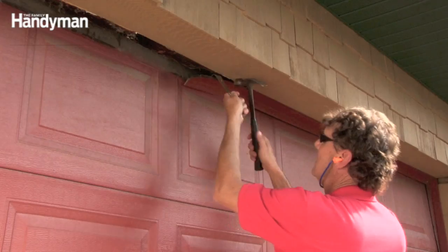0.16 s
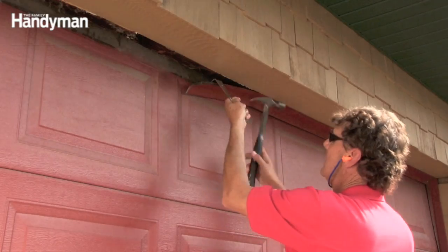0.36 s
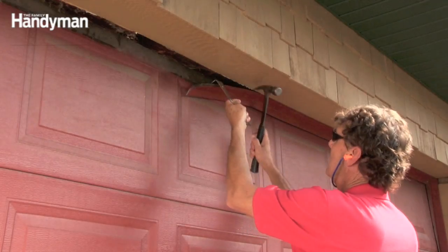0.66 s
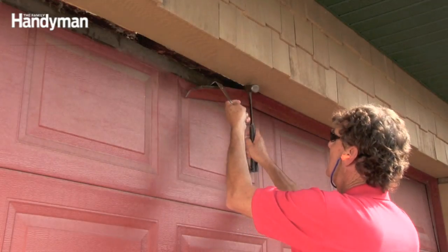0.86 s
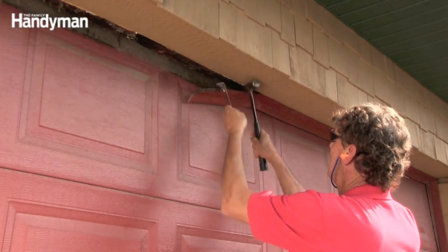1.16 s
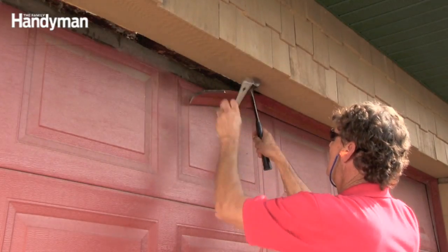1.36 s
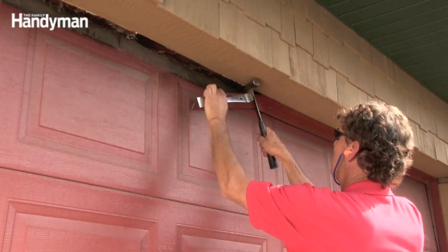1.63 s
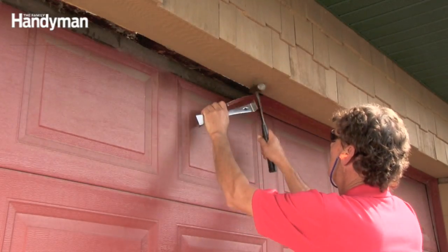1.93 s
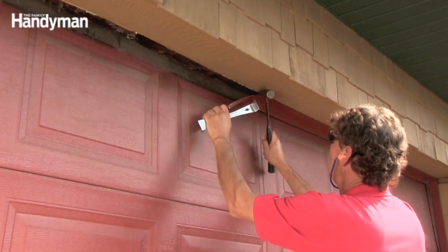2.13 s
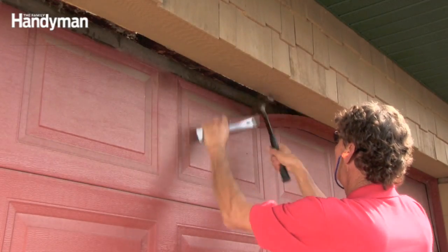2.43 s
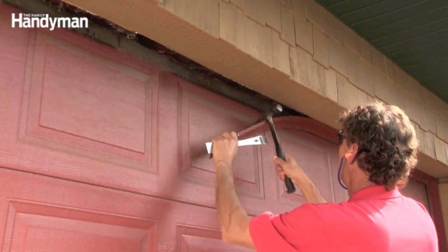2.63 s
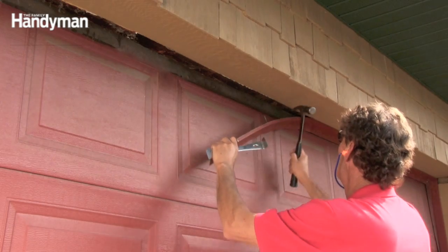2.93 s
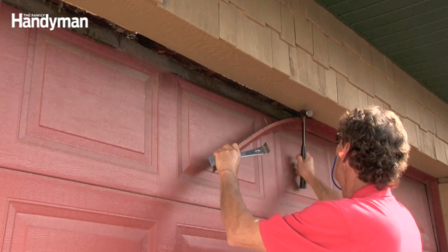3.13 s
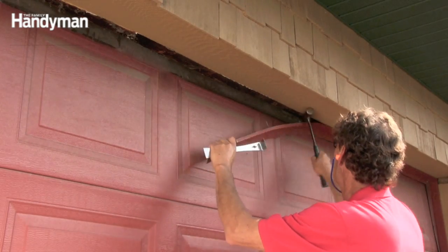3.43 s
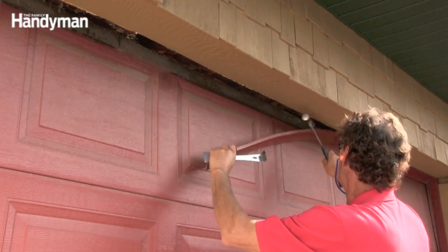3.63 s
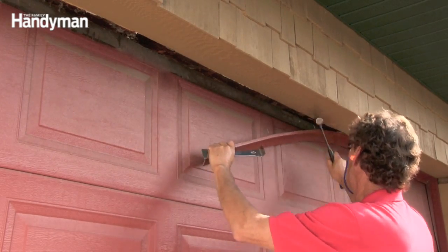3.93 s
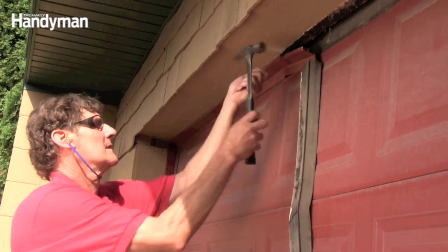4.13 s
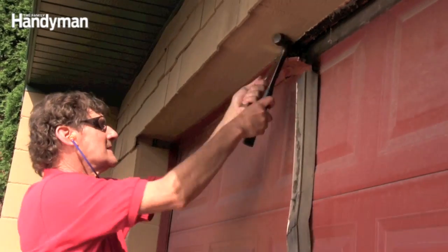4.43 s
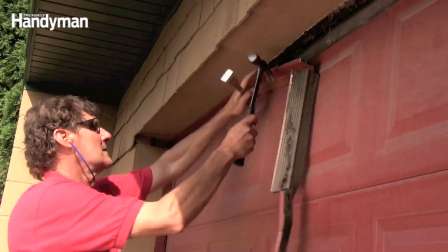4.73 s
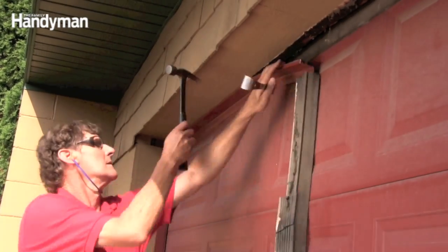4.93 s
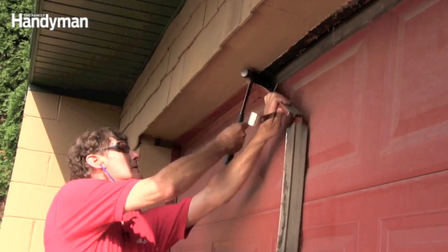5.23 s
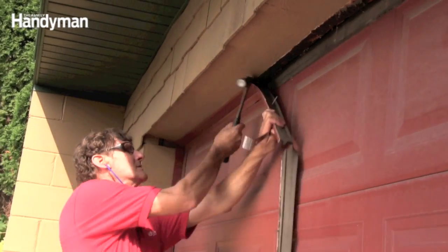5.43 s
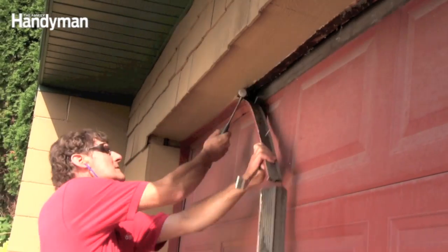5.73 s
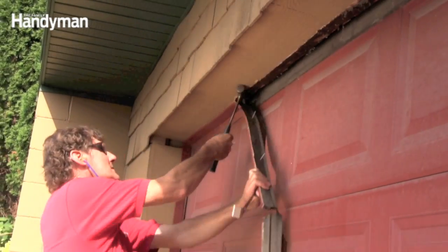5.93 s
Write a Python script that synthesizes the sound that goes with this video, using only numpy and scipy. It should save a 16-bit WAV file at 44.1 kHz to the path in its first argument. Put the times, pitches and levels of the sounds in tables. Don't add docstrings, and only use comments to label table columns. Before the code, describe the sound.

Outdoors, steel tools knock and pry at nailed wooden trim on a hollow garage door; sharp cracks, splintering creaks, clinks and one brief nail screech.

```python
import sys
import numpy as np
from scipy import signal
from scipy.fft import rfft, irfft, next_fast_len
from scipy.io import wavfile
from scipy.ndimage import uniform_filter1d, minimum_filter1d, map_coordinates

SR = 44100
rng = np.random.default_rng(int(sys.argv[2]) if len(sys.argv) > 2 else 0)


def linear_from_db(decibels):
    return 10 ** (np.asarray(decibels, float) / 20)


def transcribe(u):
    v = np.clip(np.atleast_2d(u).T, -1, 1)
    q = np.round(v * 32767).astype(np.int16)
    wavfile.write(sys.argv[1], SR, q)


N = 267466


def unit(x):
    return x / np.sqrt(np.mean(x ** 2, -1, keepdims=True) + 1e-20)


def peak_one(x):
    return x / np.abs(x).max(-1, keepdims=True)


def along(points, hz):
    f, v = np.transpose(points)
    return np.interp(np.log(hz + 1), np.log(f + 1), v)


def curves(rows):
    s, *cols = np.transpose(rows)
    return [np.interp(np.arange(N) / SR, s, c) for c in cols]


def wobble(rate_hz, size=N):
    knots = rng.standard_normal(int(size * rate_hz / SR) + 4)
    return map_coordinates(knots, [np.arange(size) * rate_hz / SR])


def add_at(out, s, sound):
    start = round(s * SR)
    out[start:start + len(sound)] += sound


def filtered(x, response):
    n = x.shape[-1]
    m = next_fast_len(n + 4096)
    return irfft(rfft(x, m) * response(np.fft.rfftfreq(m, 1 / SR)), m)[..., :n]


def body(modes, shift=1, vary_db=None):
    def response(f):
        total = 0
        for k, (hz, width_hz, db) in enumerate(modes):
            level_db = db if vary_db is None else db + vary_db[:, [k]]
            damping = 1j * f * width_hz
            total = total + (-1) ** k * linear_from_db(level_db) * damping / ((hz * shift) ** 2 - f * f + damping)
        return total
    return response


def coloured(x, spectrum):
    return unit(filtered(x, lambda hz: linear_from_db(along(spectrum, hz))))


def noise(spectrum):
    return coloured(rng.standard_normal(N), spectrum)


def grit(per_s, spread_db):
    size = np.minimum(rng.exponential(size=N), 4)
    return (rng.random(N) < per_s / SR) * rng.standard_normal(N) * linear_from_db(spread_db * size)


def held(rows):
    out, t = np.zeros(N + SR), np.arange(SR // 4) / SR
    for s, length_s, hz, db in rows:
        shape = np.clip(np.minimum(t, length_s - t) / (0.12 * length_s), 0, 1) ** 2
        level = linear_from_db(db + 1.5 * wobble(90, len(t)))
        add_at(out, s, shape * level * np.sin(2 * np.pi * hz * t + 0.2 * wobble(100, len(t))))
    return out[:N]


# (time [s], level [dB])
LOW_RUMBLE = [(0.0, -40), (0.32, -50), (1.1, -46), (1.88, -49.5), (2.2, -45), (3.1, -47), (3.5, -38.5),
              (4.0, -51), (4.6, -48.5)]
# (frequency [Hz], density [dB per Hz])
RUMBLE = [(15, -41), (25, -30), (47, -6), (65, 3), (108, -3), (170, -8), (220, -50), (370, -120)]
# (frequency [Hz], density [dB per Hz])
AIR = [(71, -35.5), (120, -2), (173, -8.5), (289, -15.5), (341, -19), (513, -13), (698, -18.5),
       (892, -19.5), (1370, -24.5), (3900, -41.5), (8310, -44), (16000, -52)]
# (time [s], level [dB])
CHORUS = [(0, -97), (.6, -91), (1.3, -85), (2.6, -81), (3.2, -77), (4.2, -79.5), (4.7, -84.5), (6.06, -85)]
# (frequency [Hz], width [Hz], level [dB])
INSECTS = [(7750, 300, -3), (8550, 160, -2), (7360, 160, -2), (6050, 200, -4), (9450, 300, -4)]
# (time [s], length [s], frequency [Hz], level [dB])
CHIRPS = [(2.74, .1, 5950, -68), (2.83, .15, 5950, -69), (1.91, .07, 6100, -76), (2.08, .07, 6150, -77),
          (3.36, .04, 6000, -75)]


def outdoors():
    chorus_db, = curves(CHORUS)
    rumble = linear_from_db(curves(LOW_RUMBLE)[0] + 2.8 * wobble(6.49)) * noise(RUMBLE)
    air = linear_from_db(-54 + 0.8 * wobble(3)) * noise(AIR)
    chorus = np.zeros(N)
    for band in INSECTS:
        pulsing = linear_from_db(chorus_db + 2.5 * wobble(25) + 2 * wobble(1.5))
        resonance = body([band])
        voice = unit(filtered(rng.standard_normal(N), lambda f: resonance(f) ** 2))
        chorus += linear_from_db(band[2]) * pulsing * voice
    return rumble + air + chorus + held(CHIRPS)


# (time [s], level [dB])
STRAIN = [(0.0, -61), (0.25, -56), (0.46, -99), (0.99, -59.5), (1.48, -68.5), (2.38, -63), (2.5, -34),
          (2.67, -56.5), (2.9, -66.5), (3.39, -58), (3.5, -43), (3.61, -39), (3.78, -49.5), (4.02, -49.5),
          (4.52, -51), (5.05, -48.5), (5.52, -51), (6.06, -57.5)]
# (time [s], length [s], rub [dB], hiss [dB], groan [dB])
STROKES = [(0.0, 0.12, -112, -86, -50), (2.128, 0.06, -48.5, -70, -60), (3.138, 0.06, -47.5, -62, -60),
           (0.828, 0.072, -46, -78, -67), (0.917, 0.038, -53.5, -56.5, -60), (1.632, 0.021, -75, -75, -73),
           (1.81, 0.056, -86, -78, -59), (2.213, 0.073, -49, -61, -54), (2.401, 0.1, -30, -30, -26),
           (2.732, 0.071, -90, -71, -49.5), (3.251, 0.058, -60, -53, -54), (3.447, 0.16, -36.5, -32, -30),
           (3.845, 0.059, -60, -46.5, -44), (3.914, 0.03, -55, -62, -45), (3.963, 0.077, -54, -52, -56.5),
           (4.335, 0.023, -30, -52, -53), (4.549, 0.12, -33.5, -40, -36.5), (4.663, 0.086, -49.5, -66, -50),
           (5.024, 0.12, -41, -55.5, -45), (5.114, 0.074, -50, -70, -51), (5.78, 0.026, -59, -67, -77)]
# (frequency [Hz], width [Hz], level [dB])
FRAME = [(847, 172, -4), (1200, 300, -0.5), (1480, 340, 0.5), (1910, 1210, -1), (2500, 1760, -3),
         (3720, 2100, -14)]
# (frequency [Hz], width [Hz], level [dB])
TRIM = [(225.3, 62, 1), (372, 69, 0.5), (495, 68, -1), (599, 276, -7.5)]
# (frequency [Hz], level [dB])
CRACK = [(1500, -32.5), (3500, 13), (5000, 11.5), (8000, 2.5), (12000, -1), (16000, -36.5)]


def scrape():
    t = np.arange(N) / SR
    level_db, = curves(STRAIN)
    over_db = level_db + 50
    rub_gain = linear_from_db(level_db - 7.5)
    crackle_gain = linear_from_db(-65 + over_db)
    groan_gain = linear_from_db(-49.5 + 1.13 * over_db)
    for s, length_s, rub_db, hiss_db, groan_db in STROKES:
        stroke = np.clip(np.minimum((t - s) / .15, s + length_s - t) / (.6 * length_s), 0, 1)
        rub_gain = rub_gain + linear_from_db(rub_db) * stroke
        crackle_gain = crackle_gain + linear_from_db(hiss_db) * stroke
        groan_gain = groan_gain + linear_from_db(groan_db) * stroke
    rub = unit(filtered(grit(3000, 2.3) * linear_from_db(1.1 * wobble(42)), body(FRAME)))
    crackle = coloured(grit(7000, 2.6) * linear_from_db(1.2 * wobble(90)), CRACK)
    groan = unit(filtered(grit(3000, .6) * linear_from_db(0.8 * wobble(22)), body(TRIM)))
    return rub_gain * rub + crackle_gain * crackle + groan_gain * groan


# (time [s], frequency [Hz], level [dB], t60 [s])
RINGS = [(0, 2450, -59, .16), (0, 3750, -56, .2), (.04, 5000, -68, .5), (.23, 3500, -59, .12),
         (.16, 13400, -71, .08), (1.272, 12220, -60, .13), (4.05, 1380, -58, .2), (4.64, 1000, -44, .2),
         (5.65, 11800, -68, .15),
         (3.4565, 4700, -15.5, 0.01), (3.4765, 4800, -16, .012), (3.4935, 4800, -14, .012),
         (3.5095, 6200, -17, 0.011), (3.526, 5500, -19, 0.013), (3.543, 5800, -20, .01),
         (3.451, 500, -16, 0.14), (3.471, 499, -14.5, 0.093), (3.488, 480, -15, 0.082),
         (3.843, 405, -16.5, 0.051), (.832, 220, -23, 0.06), (.848, 175, -24, 0.085),
         (4.64, 350, -30.5, 0.27), (4.64, 1330, -36, .1), (5.652, 340, -25, .18), (5.2, 250, -25, .1),
         (5.2, 213, -27, 0.11), (4.8, 220, -30, .15), (3.965, 920, -25.5, 0.065), (2.797, 2800, -38, 0.044),
         (2.5, 10500, -34, .015), (2.812, 9700, -43, .015), (2.766, 4400, -52, .03),
         (5.782, 1900, -43, .05), (.1395, 6400, -40, .012), (3.247, 450, -25, 0.075),
         (2.2705, 837, -20, 0.027), (5.9185, 7660, -23, 0.0063), (.311, 2900, -55, .02),
         (1.282, 3450, -55, .06), (4.66, 1050, -42, .2), (2.41, 560, -21.5, .2), (5.663, 2300, -40, .01),
         (.045, 230, -38, .2), (4.548, 2100, -12, .03), (5.545, 2000, -40, .01)]


def rings():
    t, out = np.arange(SR // 2) / SR, np.zeros(N + SR)
    for s, hz, db, t60_s in RINGS:
        level = linear_from_db(db - 60 * t / t60_s + 1.5 * wobble(49, len(t)))
        add_at(out, s, level * np.sin(2 * np.pi * hz * t + 0.6 * wobble(245, len(t))))
    return out[:N]


# (time [s], peak [dB], thud [dB], crack [dB])
KNOCKS = [(0.001, -42.5, -8, -13), (0.047, -29.5, -3, -43), (0.228, -30, -7, -42),
          (0.923, -33.5, -0.5, -13.5), (0.936, -25, -9.5, -40), (1.078, -38.5, 3, -34),
          (1.244, -30.5, -10.5, -38), (1.694, -38.5, -8, -13), (1.709, -40.5, -22, -13),
          (1.798, -40.5, 3.5, -11.5), (2.128, -16, -14, -29.5), (2.27, -19, -12, -27),
          (2.397, -3.5, -13.5, -31), (2.508, -17.5, -10, -35), (2.565, -21.5, -3.5, -30),
          (2.679, -46, 3, -31), (3.258, -40.5, 9, -25), (4.239, -44, 3.5, -21), (4.556, -11, -10, -23),
          (4.424, -38.5, -29, -8), (5.19, -32.5, -3.5, -40), (5.255, -28.5, 0.5, -40),
          (5.372, -42, -8, -18), (5.457, -29, -8, -20), (5.526, -17, -8, -18), (5.97, -37.5, -1, -18)]
# (time [s], peak [dB], thud [dB], crack [dB])
RAPS = [(0.832, -24, -6.5, -23), (1.282, -35, -11, -14.5), (2.262, -32.5, -11, -13),
        (3.137, -17.5, -7.5, -26), (3.246, -25, -5, -4), (3.449, -5, -11, -22), (3.604, -22, -20, -11),
        (3.682, -34.5, -5, -19), (3.703, -22, -13.5, -13), (3.84, -5.5, -21, -7), (3.846, -13.5, -3.5, -13),
        (3.304, -22, -9, -30), (1.547, -35.5, -10, -14.5), (4.302, -26, -8, -17), (4.34, -20, -15, -14.5),
        (4.547, 1, -41, -16), (4.561, -4.5, -14, -29), (4.619, -11.5, -15, -11), (4.634, -16.5, -5.5, -23),
        (4.843, -20.5, -6.5, -12.5), (5.545, -32, -9, -24.5), (5.631, -28, -32, -2), (5.653, -28, -19, -29),
        (5.782, -46, -33, -20), (2.462, -11, -5, -26), (3.536, -20, -28, -0.5)]
# (time [s], peak [dB], crack [dB], note [Hz], t60 [s])
CLINKS = [(0.139, -29, -39, 6350, 0.015), (0.226, -26, -31, 3950, 0.019), (2.796, -35.5, -5.5, 2800, 0.05),
          (3.738, -13.5, -14, 3780, 0.009), (3.955, -11, -12, 1930, 0.039), (3.963, -4, -5.5, 1480, 0.02),
          (4.589, -11, -4, 5440, 0.078), (4.608, -10.5, -26, 2200, 0.012),
          (5.151, -28.5, -39.5, 2550, 0.026), (5.832, -23, -35, 5570, 0.014),
          (5.836, -20, -14.5, 2130, 0.021), (5.918, -24, -9.5, 7500, 0.0091), (6.0, -30, -14, 2520, 0.11),
          (4.611, -10.5, -29, 2400, 0.012), (3.543, -20, -12, 5830, 0.02), (5.254, -17.5, -30, 2130, 0.01),
          (5.484, -21.5, -24, 2660, 0.01)]
# (time [s], peak [dB], crack [dB], note [Hz])
SLIPS = [(2.4122, -4.5, -17.5, 1100), (2.4237, -3.5, -14, 900), (2.4335, -10, -16, 1100),
         (2.4463, -4.5, -16, 1100), (3.4693, -5.5, -14, 1200), (3.4862, -6, -19, 1350),
         (3.5014, -9.5, -12, 1380), (3.5176, -16, -10, 1380), (2.4525, -7, -30.5, 700),
         (3.476, -16, -35, 4960), (3.4938, -17, -35, 4960), (3.526, -16.5, -35, 5500),
         (3.918, -50, 5, 1420), (3.9228, -52, 3, 1420), (3.9276, -52, 6, 1420), (3.9324, -55, 5, 1420)]
# (time [s], peak [dB], crack [dB])
TICKS = [(0.04, -41.5, -12), (0.303, -64, -7), (0.312, -50, -19), (0.325, -60.5, 6), (0.335, -60.5, 3),
         (0.363, -63, -2), (0.373, -71, -1), (1.092, -48.5, -1.5), (1.559, -48, -7), (2.765, -58, -3),
         (2.811, -34, -8), (2.821, -40, -4), (3.424, -42, 0), (4.181, -56, 1), (4.318, -50, 3),
         (4.378, -47, -2), (4.523, -47, -5), (4.441, -44.5, 5), (4.947, -43, -32), (5.013, -40, -23),
         (5.417, -44.5, 2), (5.802, -52, -9), (5.911, -51, 1)]


def hits():
    return ([(s, db, thud_db, crack_db, 668, 0.049) for s, db, thud_db, crack_db in KNOCKS]
            + [(s, db, thud_db, crack_db, 1280, 0.052) for s, db, thud_db, crack_db in RAPS]
            + [(s, db, -20, crack_db, hz, t60_s) for s, db, crack_db, hz, t60_s in CLINKS]
            + [(s, db, -14, crack_db, hz, 0.015) for s, db, crack_db, hz in SLIPS]
            + [(s, db, -7, crack_db, 850, 0.013) for s, db, crack_db in TICKS])


# (frequency [Hz], width [Hz], level [dB])
STEEL = [(3230, 1630, 0), (4310, 570, 5), (5380, 1800, 2), (7880, 1140, 1), (8410, 910, 2), (10400, 810, 0),
         (12100, 3200, -4.5)]


def contacts():
    s, db, thud_db, crack_db, spot_hz, t60_s = (c[:, None] for c in np.transpose(hits()))
    count, t, out = len(s), np.arange(8192) / SR, np.zeros(N + SR)
    t60_s, rise = np.clip(t60_s, .004, .3), 1 - np.exp(-t / 0.00088)
    blow = (np.arange(len(t)) == 40) * 1.0

    def chance(columns):
        return rng.standard_normal((count, columns))

    def push(life_s, spike):
        decay = linear_from_db(-60 * t / life_s) + 3.2 * linear_from_db(-60 * t / 0.017)
        return chance(len(t)) * rise * decay + spike * blow

    shift = 1 + .02 * chance(1)
    spot_hz = spot_hz * (1 + .08 * chance(1))
    frame = body(FRAME, shift, 1.6 * chance(len(FRAME)))
    steel = body(STEEL, shift, 1.2 * chance(len(STEEL)))
    strip = body(TRIM, shift, 1.5 * chance(len(TRIM)))
    spot = body([(spot_hz, .6 * spot_hz, 1.5)])
    knock = filtered(push(t60_s, 18.3), lambda f: (frame(f) + spot(f)) / (1 + 1j * f / 4500) ** 2)
    crack = filtered(push(.45 * t60_s, 12), lambda f: steel(f) * 1j * f / (2000 + 1j * f))
    thud = filtered(push(1.24 * t60_s, 26), lambda f: strip(f) / (1 + 1j * f / 1200))
    rows = linear_from_db(db - 2) * peak_one(knock)
    rows += linear_from_db(db + crack_db + 7.5) * peak_one(crack)
    rows += linear_from_db(db + thud_db + 3.5) * peak_one(thud)
    for row, start_s in zip(rows, s[:, 0]):
        add_at(out, start_s, row)
    return out[:N]


# (frequency [Hz], t60 [s])
EAVES = [(150, .3), (1000, .18), (4000, .07), (14000, .045)]


def eaves(x):
    out, step = np.zeros(N + SR), 8192
    for start in range(0, N, step):
        hz, t, z = signal.stft(rng.standard_normal(SR // 3), SR, nperseg=256)
        decay = linear_from_db(-60 * t / along(EAVES, hz)[:, None])
        tail = signal.istft(z * decay, SR, nperseg=256)[1]
        wet = signal.fftconvolve(x[start:start + step], tail / np.linalg.norm(tail))
        out[start + 200:start + 200 + len(wet)] += wet
    return out[:N]


# (time [s], peak [dB])
BOOMS = [(0.042, -32.5), (0.226, -43), (0.831, -24.5), (0.846, -23), (0.937, -25.5), (1.015, -44),
         (2.129, -26), (2.143, -23), (2.277, -28.5), (2.398, -27), (2.421, -23), (2.509, -29), (2.678, -49),
         (3.14, -24.5), (3.308, -26), (3.45, -33.5), (3.521, -20.5), (3.598, -28), (3.846, -24.5),
         (3.964, -34.5)]
# (frequency [Hz], level [dB], t60 [s])
DOOR = [(74.7, -21.5, 0.39), (94.2, -0.5, 0.3), (124.2, -9.5, 0.22), (220, -5.5, .08)]


def door():
    t, out = np.arange(SR // 2) / SR, np.zeros(N + SR)
    swell = 1 - np.exp(-t / 0.0062)
    for s, db in BOOMS:
        panel = np.zeros(len(t))
        for hz, level_db, t60_s in DOOR:
            vary_db, detune = 2.53 * rng.standard_normal(), 1 + 0.023 * rng.standard_normal()
            panel += linear_from_db(level_db + vary_db - 60 * t / t60_s) * np.sin(2 * np.pi * hz * detune * t)
        add_at(out, s, linear_from_db(db + 3.5) * panel * swell)
    return out[:N]


# (time [s], length [s], level [dB])
BRUSHES = [(1.343, .003, -68), (1.43, .006, -70), (1.488, .01, -70), (1.513, .003, -68), (1.625, .026, -61),
           (1.705, .01, -53), (1.768, .025, -70), (1.822, 0.019, -66), (1.842, .003, -64),
           (1.865, .035, -72), (1.94, .012, -71), (5.577, .008, -66), (2.736, .036, -61),
           (2.882, .003, -68), (.238, .004, -64), (5.8, .004, -58), (5.332, .003, -64), (5.382, .004, -60),
           (5.312, .01, -66), (4.174, .004, -64), (3.839, .03, -30)]
# (frequency [Hz], density [dB per Hz])
BRUSH = [(4000, -40), (7000, -5.5), (10500, -1), (14000, -8), (16500, -8)]


def brushes():
    t, gain = np.arange(2048) / SR, np.zeros(N + SR)
    for s, length_s, db in BRUSHES:
        add_at(gain, s, linear_from_db(db) * np.clip(np.minimum(t, length_s - t) / (0.33 * length_s), 0, 1))
    return gain[:N] * noise(BRUSH)


# (time [s], level [dB])
SLIDE = [
    (1.23, -84),
    (1.24, -51.5),
    (1.27, -48),
    (1.29, -52),
    (1.33, -99),
]
# (frequency [Hz], width [Hz], level [dB])
BAR = [(1100, 310, 10), (1610, 540, 4), (3550, 160, -4.5), (4570, 190, 3), (5570, 300, -8.5),
       (7100, 220, -12), (12300, 150, -5)]


def slide():
    return linear_from_db(curves(SLIDE)[0]) * unit(filtered(grit(5000, 1.7), body(BAR)))


# (time [s], length [s], frequency [Hz], level
# [dB])
SQUEALS = [(5.035, 0.087, 350, -40.5), (4.2, 0.057, 300, -44), (5.04, 0.034, 800, -40),
           (5.035, .065, 930, -44), (5.04, .06, 1502, -43), (5.04, .04, 1367, -44), (4.3, 0.046, 860, -54),
           (5.596, .028, 9700, -25), (5.596, .015, 8300, -27), (4.2, .13, 9500, -74),
           (4.44, .11, 9250, -72), (1.25, .04, 1650, -58), (1.235, .06, 4600, -64)]


def squeals():
    return held(SQUEALS)


# (time [s], hold [s], rms [dB])
SNAPS = [(2.4114, 0.0034, -19), (2.428, 0.0022, -24), (2.4323, 0.0032, -21), (2.4477, 0.0025, -21),
         (3.4688, 0.0016, -23), (3.484, 0.0024, -19.5), (3.503, 0.0026, -23), (3.5177, 0.0054, -22),
         (3.533, 0.0024, -26.5), (3.8402, 0.0055, -19.5), (3.973, 0.0023, -24), (4.547, 0.0062, -18),
         (4.5584, 0.0011, -17), (4.562, .001, -18), (4.61, .001, -27), (5.631, 0.0022, -22.5),
         (5.635, .001, -28.5)]
# (frequency [Hz], level [dB])
SNAP = [(500, -29), (1500, -3), (4500, 2.5), (7000, -3.5), (10800, -3), (15500, -8)]


def snaps():
    t, gain, t60_s = np.arange(2048) / SR, np.zeros(N + SR), 0.0076
    for s, hold_s, db in SNAPS:
        add_at(gain, s, linear_from_db(db - 60 * np.maximum(t - hold_s, 0) / t60_s))
    return gain[:N] * noise(SNAP)


# (time [s], slip rate [Hz], level [dB])
SCREECH = [
    (5.592, 2500, -67.5),
    (5.595, 2476, -10.5),
    (5.605, 2790, -12.5),
    (5.617, 3370, -13),
    (5.626, 3530, -24),
    (5.636, 3360, -42),
    (5.65, 3470, -50),
]


def screech():
    t = np.arange(N) / SR
    rate_hz, level_db = curves(SCREECH)
    phase = 2 * np.pi * np.cumsum(rate_hz * (1 + 0.046 * wobble(1500))) / SR
    overtones = [(1, -3.5), (2, -17.5), (3, -14), (4, -13), (5, -16.5)]  # (multiple, dB)
    tone = sum(linear_from_db(db) * np.sin(k * phase) for k, db in overtones)
    judder_gain = linear_from_db(-6.5 - 1200 * np.maximum(t - 5.612, 0))
    judder = judder_gain * np.sin(2 * np.pi * 740 * t + .5 * wobble(200))
    hiss = linear_from_db(-2.0) * noise([(120, -30), (300, 0.5), (1000, 4.5), (4000, 3.0), (16000, -6)])
    gain = linear_from_db(level_db) * (level_db > -49)
    return gain * (tone * linear_from_db(2.7 * wobble(600)) + judder + hiss)


def scene():
    work = contacts() + door() + rings() + screech() + slide() + snaps()
    echo = linear_from_db(-13.0) * eaves(work)
    return (work + echo + scrape() + squeals() + brushes() + outdoors())[None]


def low_pass(x):
    return signal.sosfilt(signal.butter(12, 16820, fs=SR, output="sos"), x)


def record(dry):
    view_s, view_hz = 4.63, 190
    x = filtered(dry, lambda hz: (1j * hz / (30 + 1j * hz)) ** 2)
    thin = signal.sosfilt(signal.butter(4, view_hz, "high", fs=SR, output="sos"), x)
    later = np.clip((np.arange(N) / SR - view_s) / 0.021, 0, 1)
    x = x + later * (1 - linear_from_db(-40)) * (thin - x)
    ceiling = np.where(x > 0, .57, .45)
    need = np.minimum(1, ceiling / (np.abs(x) + 1e-9))
    gain = uniform_filter1d(minimum_filter1d(need, size=5), size=3)
    x = filtered(x * gain, lambda hz: np.clip((16500 - hz) / 900, 0, 1))
    return low_pass(x)


dry = scene()
out = record(dry)
transcribe(out)
```